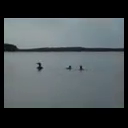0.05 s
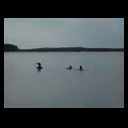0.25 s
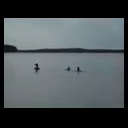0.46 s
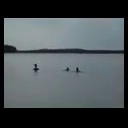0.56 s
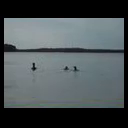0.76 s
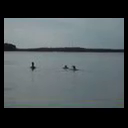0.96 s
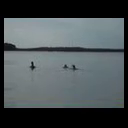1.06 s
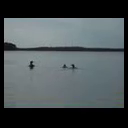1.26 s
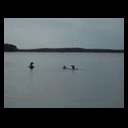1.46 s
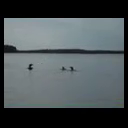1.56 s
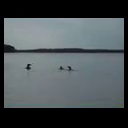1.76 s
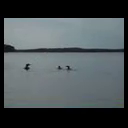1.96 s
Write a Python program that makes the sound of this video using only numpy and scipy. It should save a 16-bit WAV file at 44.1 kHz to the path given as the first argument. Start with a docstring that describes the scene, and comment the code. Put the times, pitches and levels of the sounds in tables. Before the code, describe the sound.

At about 0.2 seconds a loon calls loudly across a calm lake: a reedy low note flips up into a pure high note, warbles four times, then drops and ends by 0.9 seconds. A tiny click falls at 0.6 seconds. A faint, smeared echo lingers afterward. Soft air and water and a thin camera whine run throughout, with a slight wind puff near 1.6 seconds.

```python
"""A calm lake with a wooded far shore, heard through the microphone of a small camera.
A loon gives one tremolo call: a reedy low note flips up into a pure, warbling high note and drops back.
An edit cut clicks mid-warble. The far shore returns a faint, smeared echo over a wash of air and water.
The camera whines, its microphone catches a puff of wind, and its limiter ducks under the call."""
import sys
import numpy as np
from scipy import signal
from scipy.fft import rfft, irfft, next_fast_len
from scipy.io import wavfile
from scipy.ndimage import uniform_filter1d, map_coordinates

SR = 44100
rng = np.random.default_rng(int(sys.argv[2]) if len(sys.argv) > 2 else 0)


def master_out(mix):
    """Clip the mix to full scale and print it as 16-bit PCM to the path in sys.argv[1]."""
    frames = np.transpose(np.atleast_2d(mix))
    ceiling = np.clip(frames, -1, 1)
    pcm = np.round(ceiling * 32767).astype(np.int16)
    wavfile.write(sys.argv[1], SR, pcm)


N = 88200
TIME = np.arange(N) / SR


def amp(db):
    """Decibels to gain."""
    return 10 ** (np.asarray(db) / 20)


def level_at(curve, hz):
    """The level of a (frequency, level) curve at hz, along a log frequency axis."""
    curve_hz, curve_db = np.transpose(curve)
    return np.interp(np.log(hz + 1), np.log(curve_hz + 1), curve_db)


def wobble(rate):
    """A smooth random curve, rate knots a second."""
    return map_coordinates(rng.standard_normal(2048), [TIME * rate + 2], mode="mirror")


def filtered(x, response):
    """x shaped by a gain that depends on frequency."""
    size = next_fast_len(N + SR // 2)
    return irfft(rfft(x, size) * response(np.fft.rfftfreq(size, 1 / SR)), size)[:N]


def noise(colour):
    """Coloured noise of rms 1."""
    x = filtered(rng.standard_normal(N), lambda hz: amp(level_at(colour, hz)))
    return x / np.sqrt(np.mean(x ** 2))


# The bed of air and water over the lake: (frequency [Hz], relative level [dB])
WASH_COLOUR = [(20, -33.5), (50, -13), (130, -5.5), (190, -6), (260, -1.5), (400, -5.5), (560, -6),
               (900, -8.5), (1400, -10.5), (2200, -16), (3200, -23), (4500, -26), (6500, -29),
               (9300, -32.5), (10200, -39.5), (11200, -61.5), (13000, -87)]
# Swells in its lower middle: (time [s], level [dB])
SWELL_LEVELS = [(0, -50), (.3, -47.5), (.7, -60), (1.35, -47), (1.54, -40.5), (1.62, -43.5), (1.74, -55),
                (1.81, -41.5), (2, -43.5)]
# Their spectrum: (frequency [Hz], relative level [dB])
SWELL_COLOUR = [(60, -45), (150, -9.5), (250, -2.5), (390, 1), (550, -7.5), (1000, -19), (2500, -32.5),
                (6000, -53), (11000, -110)]

def air_and_water(wash_db=-40, drift_db=0):
    """A soft wash around the microphone, steady unless drift_db is raised, with swells on top."""
    wash = amp(wash_db + drift_db * wobble(6.7)) * noise(WASH_COLOUR)
    swell_db = np.interp(TIME, *np.transpose(SWELL_LEVELS))
    return wash + amp(swell_db) * noise(SWELL_COLOUR)


# Wind rumble right on the microphone: (frequency [Hz], relative level [dB])
PUFF_COLOUR = [(10, -2), (25, -7), (50, -1.5), (100, -12), (250, -42), (1000, -90)]

def wind_puff(peak_s=1.625, width_s=0.15, db=-45.5):
    """One faint puff of wind brushes the microphone after the call."""
    return amp(db) * np.exp(-((TIME - peak_s) / width_s) ** 2) * noise(PUFF_COLOUR)


# The camera's motor, next to the microphone: (frequency [Hz], level [dB], waver rate [Hz])
MOTOR_LINES = [(183.6, -51, 4.4), (307, -50, 4), (5590, -61, 32), (7849, -69, 5.2)]

def camera_whine():
    """Narrow, unsteady lines of motor hum and whine."""
    return sum(amp(db) * np.sqrt(2) * np.sin(2 * np.pi * hz * TIME + 1.28 * wobble(rate))
               for hz, db, rate in MOTOR_LINES)


def echo(call, delay_s, db, t60_s, rise_s=0.0066):
    """A delayed copy, smeared by many small reflectors."""
    age = np.maximum(TIME - delay_s, 0)
    tail = rng.standard_normal(N) * (1 - np.exp(-age / rise_s)) * amp(-60 * age / t60_s)
    return amp(db) * signal.fftconvolve(call, tail / np.linalg.norm(tail))[:N]


# Returns from across the water: (delay [s], level before colouring [dB], time to fall 60 dB [s])
SHORE_ECHOES = [(.606, -33, .05), (0.622, -37.5, .35), (0.658, -35, 6.6), (.825, -40.5, 0.091)]
# How the distant wooded shore colours them: (frequency [Hz], gain [dB])
SHORE_COLOUR = [(500, 14), (750, 2.5), (1000, 0.5), (1300, -2), (1700, -5), (3000, -24), (8000, -43)]

def lake_echoes(call):
    """Weak scatter from close by, then the dull answer of the far shore."""
    far = sum(echo(call, *shore) for shore in SHORE_ECHOES)
    near = echo(call, delay_s=0.018, db=-27.5, t60_s=0.54)
    return near + filtered(far, lambda hz: amp(level_at(SHORE_COLOUR, hz)))


SPLICE_S = 0.637  # an edit cut clicks and makes the pitch jump mid-warble

def splice_click(db=-7.5, decay_s=0.0001):
    """A tiny sharp step in the waveform at the edit cut."""
    age = TIME - SPLICE_S
    return amp(db) * (age >= 0) * np.exp(-np.abs(age) / decay_s)


# The loon's upper overtones flare near the top of an upswing: (time [s], boost [dB])
FLARES = [(.308, 5), (0.411, 10.5), (0.516, 12.5), (0.623, 2)]

def loon_voice(hz, throat, edge_db, flicker_db, swell_db=0, top_db=0):
    """A clean tone whose overtones flicker, flare and rasp as they sweep the throat's resonances."""
    jitter = 1 + 0.0015 * wobble(400)
    phase = 2 * np.pi * np.cumsum(hz * jitter) / SR
    bumps = [(np.exp(-((TIME - s) / 0.011) ** 2), db) for s, db in FLARES]
    flare = sum(bump for bump, _ in bumps)
    flare_db = sum(bump * db for bump, db in bumps)
    tone = amp(swell_db) * np.sin(phase)
    for k in range(2, 13):
        overtone_hz = k * hz
        treble = np.clip((overtone_hz - 1850) / 300, 0, 1)
        upper = np.clip((overtone_hz - 2500) / 2000, 0, 1)
        top = np.clip((overtone_hz - 4600) / 600, 0, 1)
        treble_db = edge_db + flicker_db * wobble(75)
        db = level_at(throat, overtone_hz) + treble * treble_db + upper * flare_db + top * top_db
        rasp = 1 + 0.38 * treble * flare * wobble(900)
        tone += amp(db) * rasp * np.sin(k * phase) * (overtone_hz < throat[-1][0])
    return np.sqrt(2) * tone


def contours(note, fade_s=0.0078):
    """Pitch, gain and reedy edge (a treble gain) of a note, silent outside it."""
    times, *columns = np.transpose(note)
    hz, db, edge_db = [np.interp(TIME, times, column) for column in columns]
    gate = np.clip(np.minimum(TIME - times[0], times[-1] - TIME) / fade_s, 0, 1)
    return uniform_filter1d(hz, size=300), gate * amp(db), edge_db


# The loon's first note, out on the lake: (time [s], pitch [Hz], level [dB], reedy edge [dB])
OPENING_NOTE = [(.212, 694, -26, -19.5), (.223, 775, -22, -11.5), (.238, 801, -18, -9.5),
                (.256, 757, -17, 0.5), (.275, 723, -15.5, -4), (.289, 701, -15, -3),
                (.302, 785, -19.5, -0.5), (.313, 852, -7, -4), (.324, 887, -8.5, -9),
                (.336, 911.5, -6.5, -9), (.350, 879, -8.5, -5), (.360, 926, -19.5, -12.5)]
# Its throat resonances: (frequency [Hz], overtone gain [dB])
OPENING_THROAT = [(1250, -3), (1420, -12.5), (1590, 2.5), (1700, -2.5), (1810, -4.5), (2050, -33),
                  (2200, -33.5), (2370, -13), (2520, -36.5), (2700, -20.5), (2950, -55.5), (3580, -25),
                  (4000, -25.5), (4500, -26.5), (4950, -29), (5400, -21), (5820, -13), (6400, -30.5),
                  (7200, -41), (8600, -44.5), (10500, -62.5)]

def loon_opening_note():
    """The reedy low register climbs into the call."""
    hz, gain, edge_db = contours(OPENING_NOTE)
    return gain * loon_voice(hz, OPENING_THROAT, edge_db, flicker_db=4)


# The last note: (time [s], pitch [Hz], level [dB], reedy edge [dB])
CLOSING_NOTE = [(.775, 713, -9.5, -11), (.783, 691.6, -15.5, -1), (.808, 704.2, -15, -3),
                (.828, 689.5, -17, -3.5), (.850, 653, -21.5, -18), (.872, 635, -29.5, -23),
                (.892, 627, -47.5, -18)]
# Its throat resonances: (frequency [Hz], overtone gain [dB])
CLOSING_THROAT = [(1230, -11), (1400, -11), (2100, -47), (2800, -35.5), (3500, -22.5), (4200, -30.5),
                  (4900, -37.5), (5600, -28.5), (6300, -60.5), (7500, -60)]

def loon_closing_note():
    """The low register again, steadier, sinking as it fades."""
    hz, gain, edge_db = contours(CLOSING_NOTE)
    return gain * loon_voice(hz, CLOSING_THROAT, edge_db, flicker_db=2.5)


# The high note between them, under its warbles: (time [s], pitch [Hz], level [dB], reedy edge [dB])
HIGH_NOTE = [(.358, 1072, 0.5, -13.5), (.366, 1059, -9, -4), (.386, 1006, -9.5, -4),
             (.460, 999.6, -9, -2.5), (.595, 1000, -10, -7), (.645, 1014, -8, 1), (.683, 973.3, -10, -0.5),
             (.745, 1009, -9, 0.5), (.779, 967, -12.5, -1.5)]
# Its throat resonances: (frequency [Hz], overtone gain [dB])
HIGH_THROAT = [(2000, -36.5), (2350, -21), (2600, -23.5), (3050, -47.5), (3550, -33.5), (3900, -38),
               (4100, -32), (4750, -29.5), (5150, -31), (5600, -27), (6300, -34), (6900, -45),
               (7700, -39.5), (8300, -48), (10500, -65.5)]
# Its warbles: (time [s], pitch lift [Hz], rise [s], fall [s], swell of the fundamental [dB])
WARBLES = [(.427, 296.8, .0275, .026, 10), (0.529, 295.3, .0255, .026, 10), (0.634, 256.9, .026, .03, 6),
           (.711, 183.8, .019, .028, 1)]

def loon_high_note():
    """The pure register: each warble lifts the pitch and swells at its top."""
    hz, gain, edge_db = contours(HIGH_NOTE)
    after_splice = TIME >= SPLICE_S
    swell_db, trough = np.zeros(N), np.ones(N)
    for peak_s, lift_hz, rise_s, fall_s, db in WARBLES:
        width_s = np.where(TIME < peak_s, rise_s, fall_s)
        arch = np.exp(-np.abs((TIME - peak_s) / width_s) ** 2.52)  # a slightly flat-topped bell
        if peak_s <= SPLICE_S + fall_s:
            arch[after_splice] = 0
        hz += lift_hz * arch
        swell_db += db * arch ** 1.65
        trough -= arch
    swell_db = uniform_filter1d(swell_db, size=40)
    edge_db -= 2 * trough  # overtones fade between the warbles
    # After the splice the highest overtones are muted and a faint buzz shakes the tone.
    top_db = -17 * after_splice
    buzz = 1 + after_splice * amp(-28) * np.sin(2 * np.pi * 295 * TIME)
    tone = loon_voice(hz, HIGH_THROAT, edge_db, flicker_db=4, swell_db=swell_db, top_db=top_db)
    return gain * buzz * tone


def scene():
    """The call, the lake's echoes, the background and the splice click, in mono."""
    call = loon_opening_note() + loon_high_note() + loon_closing_note()
    echoes = lake_echoes(call)
    background = air_and_water() + wind_puff() + camera_whine()
    return (background + echoes + splice_click() + call)[None]


def record(dry, ceiling_db=-3, release_db_per_s=19, top_hz=16000):
    """The camera's limiter ducks fast, recovers slowly and thumps faintly; then the band limit."""
    mic = dry[0]
    over_db = np.maximum(20 * np.log10(np.abs(mic) + 1e-9) - ceiling_db, 0)
    recovery_db = release_db_per_s * TIME
    duck_db = np.maximum.accumulate(over_db + recovery_db) - recovery_db
    gain = amp(-uniform_filter1d(duck_db, size=90))
    thump = amp(-31) * signal.lfilter(*signal.butter(1, 2.6, "high", fs=SR), gain - 1)
    return filtered(mic * gain + thump, lambda hz: hz < top_hz)[None]


dry = scene()
out = record(dry)
master_out(out)
```